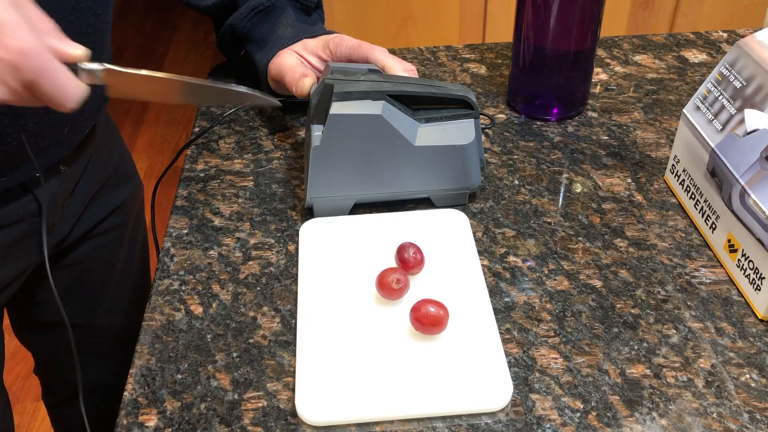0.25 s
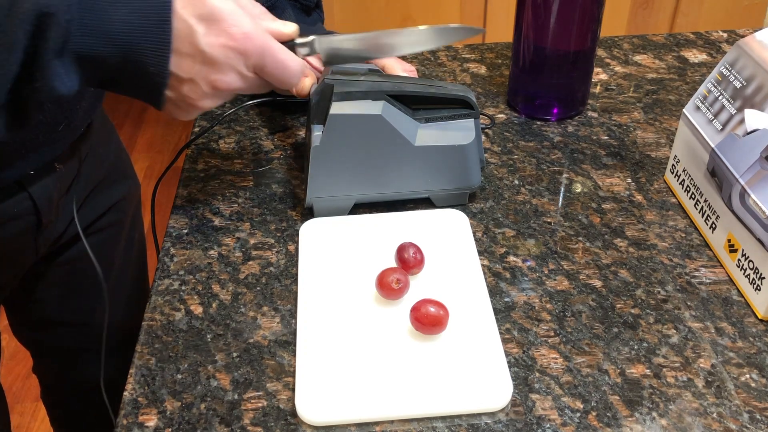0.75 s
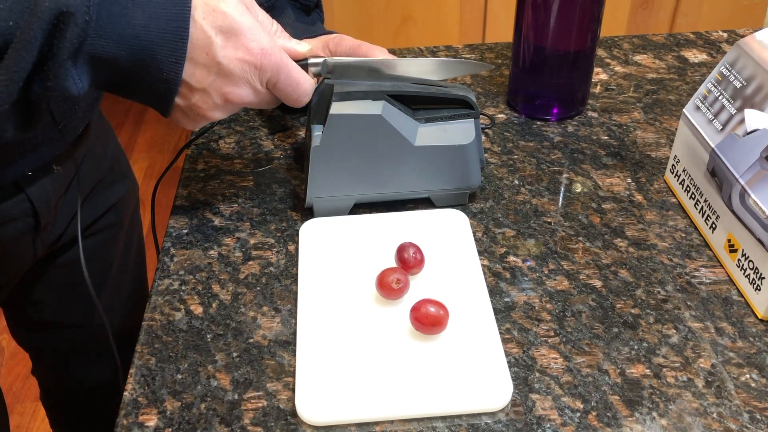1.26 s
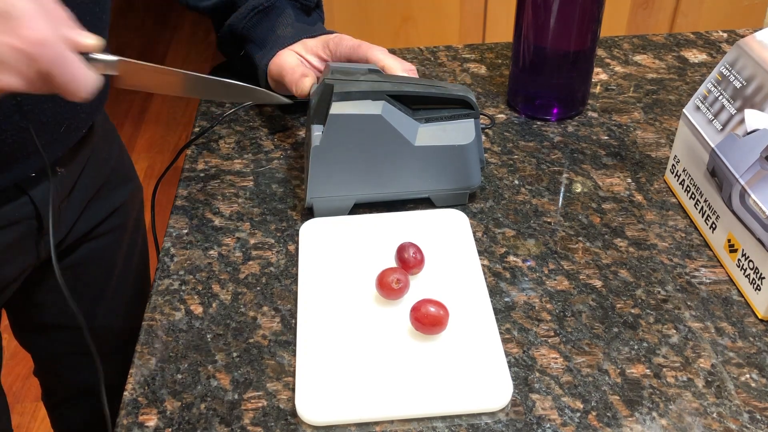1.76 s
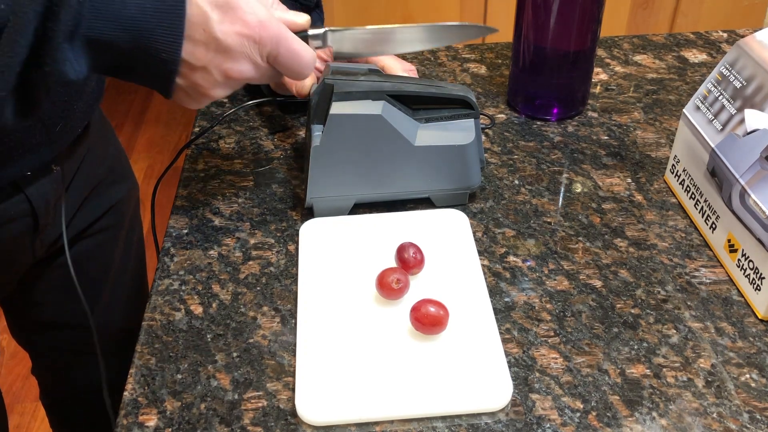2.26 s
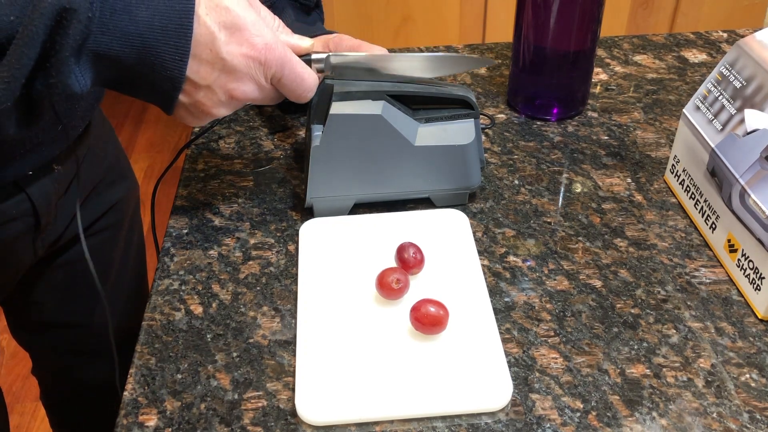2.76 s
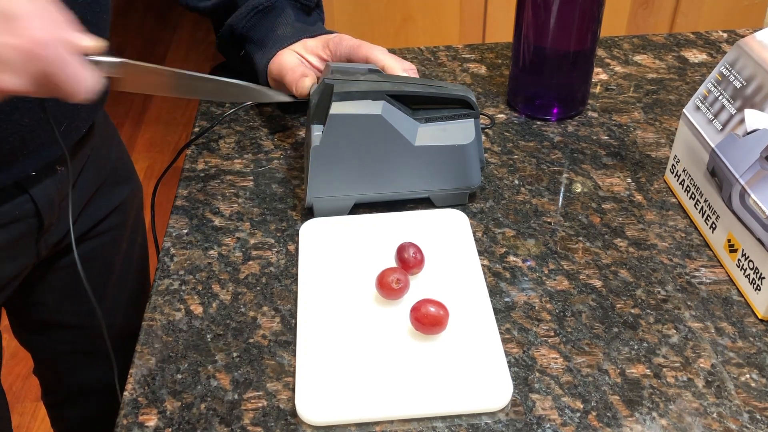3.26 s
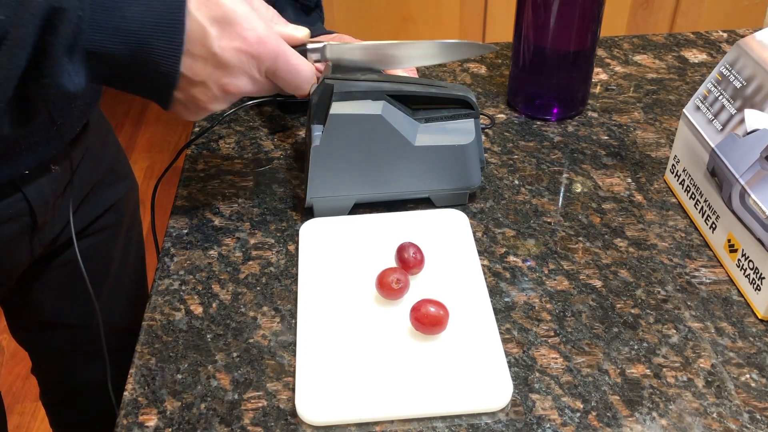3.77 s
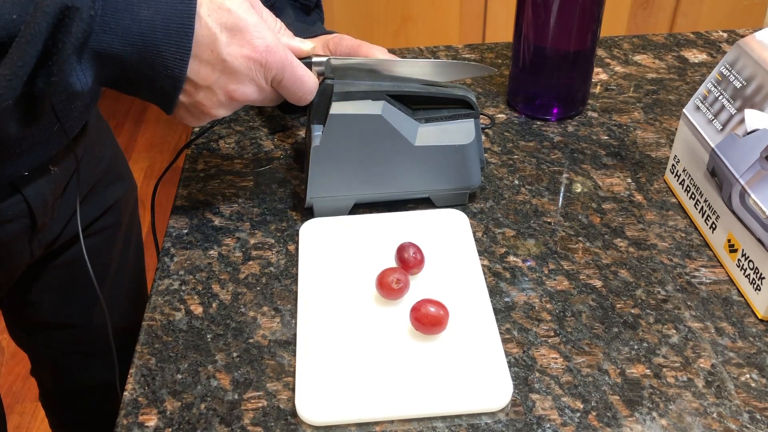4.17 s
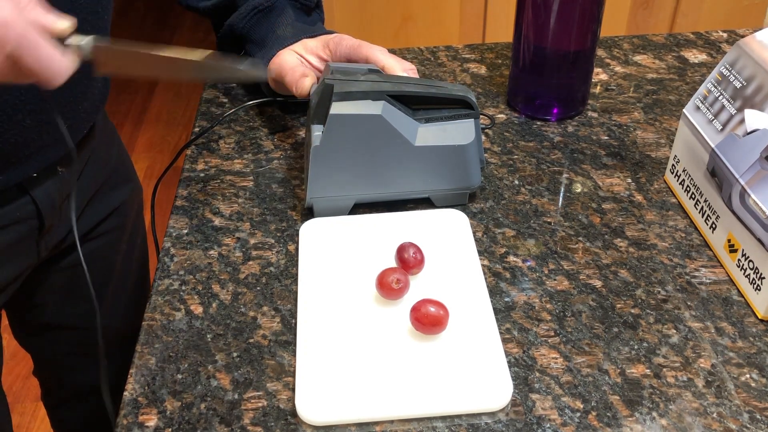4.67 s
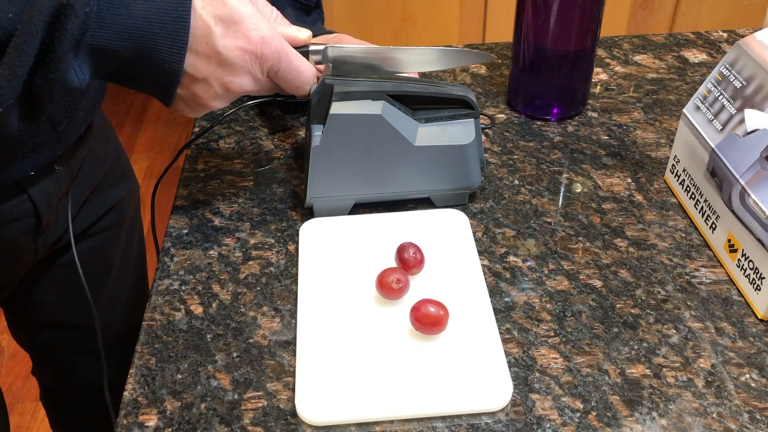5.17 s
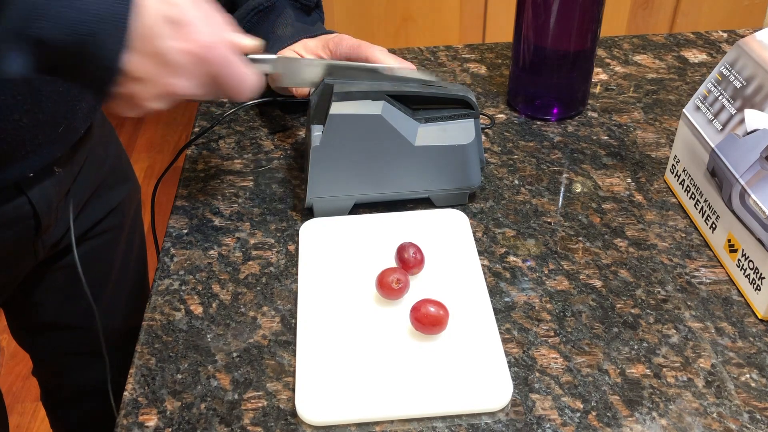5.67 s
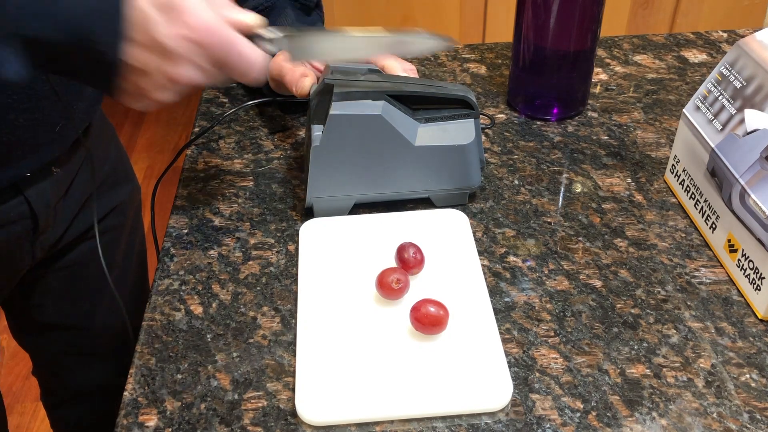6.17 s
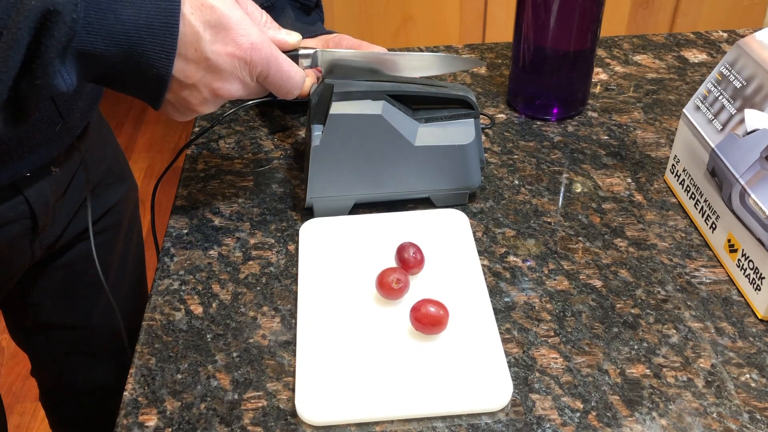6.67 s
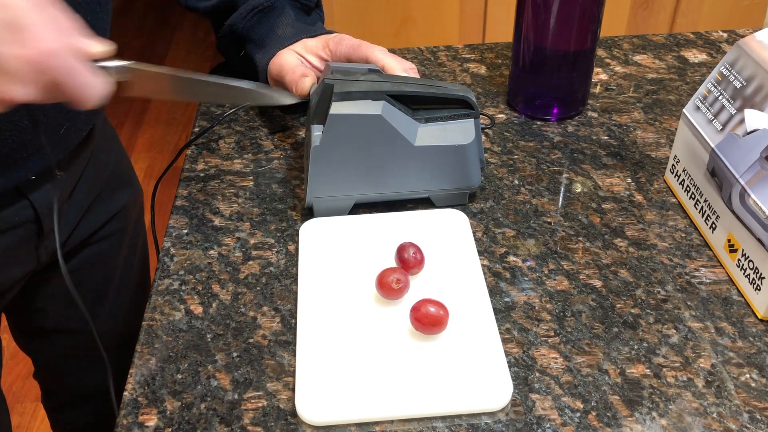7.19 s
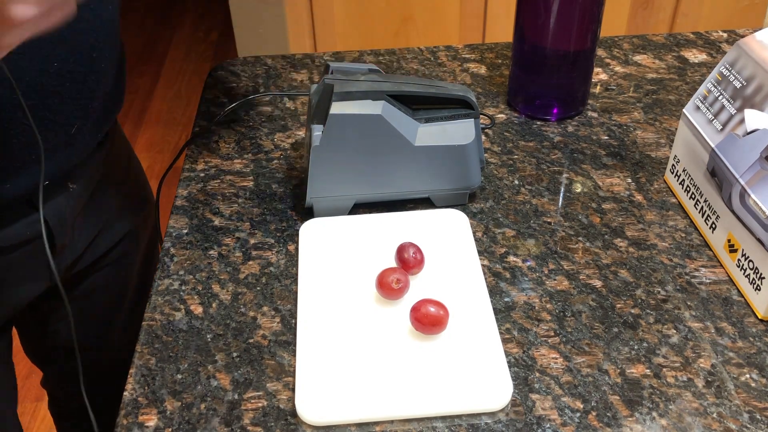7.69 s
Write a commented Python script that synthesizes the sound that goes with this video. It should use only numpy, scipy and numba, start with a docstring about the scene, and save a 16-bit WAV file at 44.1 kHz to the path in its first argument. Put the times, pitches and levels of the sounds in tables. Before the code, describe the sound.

Six knife strokes through a plastic sharpener on a stone counter, the first already rasping. Each later one begins with a knock of blade in slot, grows into a coarse, buzzy scrape with thin steel hiss, and ends in a loud snap and rattle. The pauses hold soft sleeve rustle, small ticks and quiet room noise. The near microphone catches bumps through the counter and slight kitchen echo.

```python
"""A knife edge is already rasping over grit; it snaps out of the sharpener, and the plastic housing rattles on.
More strokes follow, about 1.4 s apart: the blade taps into the honing slot, is drawn through and snaps out.
Random grains ring the modes of housing and steel; short pulses ring them for the knocks.
A quiet kitchen hums behind as filtered noise; sleeves rustle as soft hiss and ticks are brief tones.
The counter shakes the microphone with slow sway and dull thuds; two moments bring thin squeals."""
import sys
import numpy as np
from scipy import signal
from scipy.fft import rfft, irfft
from scipy.io import wavfile
from scipy.ndimage import uniform_filter1d
from numba import njit

SR = 44100
rng = np.random.default_rng(int(sys.argv[2]) if len(sys.argv) > 2 else 0)


def generate_wav(signal):
    """Clip the signal to [-1, 1] and save it as 16-bit WAV at the path in sys.argv[1]."""
    frames = np.transpose(np.atleast_2d(signal))
    scaled = np.clip(frames, -1, 1) * 32767
    pcm = np.round(scaled).astype(np.int16)
    wavfile.write(sys.argv[1], SR, pcm)


N = 349713  # samples, about 7.9 s

# Tone colour of the room noise. Each row: frequency in Hz, relative level in dB per Hz.
ROOM_COLOUR = [(59, -49), (100, -25.5), (124, -4), (189, -3), (314, -7), (380, -4), (460, -4), (688, -8),
               (1120, -16.5), (2210, -29), (4500, -36.5), (8930, -41.5), (13000, -44), (15800, -52)]
# The room noise swells as the cook steps away. Each row: time in seconds, dB above the steady level.
ROOM_SWELL = [(0, 0), (7.3, 1.5), (7.6, 1.5), (7.93, 5.5)]
# Slow sway of the stand. Each row: time in seconds, level in dB.
SWAY = [(0.0, -54), (0.04, -45), (0.57, -41), (1.37, -56.5), (1.72, -39.5), (3.07, -58), (3.24, -37),
        (3.95, -58), (4.06, -48.5), (4.62, -39), (5.46, -56), (5.81, -40), (6.07, -42), (6.4, -55),
        (6.67, -39), (6.73, -42.5), (7.09, -42.5), (7.93, -53)]
# Thuds through the counter. Each row: peak time in seconds, level in dB, rise in seconds, fall in seconds.
THUDS = [(.04, -41, 0.05, 0.11), (.15, -42.5, 0.071, 0.11), (0.558, -43.5, 0.057, 0.089),
         (.64, -58, 0.031, 0.048), (.7, -45, 0.12, 0.071), (.8, -52, 0.053, 0.05), (1.19, -53, 0.08, 0.072),
         (1.63, -46, 0.32, 0.4), (2.72, -59, .05, 0.16), (3.03, -46.5, 0.025, 0.048),
         (3.16, -38, 0.08, 0.034), (3.4, -65, .15, .2), (4.3, -53, 0.17, 0.064), (4.46, -45, 0.11, 0.055),
         (5.39, -56.5, 0.058, 0.081), (5.59, -45, 0.045, 0.1), (5.78, -41.5, 0.29, 0.081),
         (6.18, -55.5, 0.077, 0.036), (7.12, -44.5, 0.41, 0.1), (7.58, -53, 0.11, 0.034)]
# Resonances of the housing. Each row: pitch in Hz, basic width in Hz (scaled when used), relative level in dB.
HOUSING_MODES = [(388, 54, -4), (437.8, 18.7, 2.5), (492.8, 40.5, -1.5), (570.6, 69, -4.5), (709, 41, -8),
                 (830.7, 28.4, -1.5), (884.7, 32, -2), (1029, 105, -21.5)]
# Higher resonances of the housing. Each row: pitch in Hz, basic width in Hz, relative level in dB.
UPPER_MODES = [(1006, 59, 3.5), (1346, 153, 11.5), (1559, 35, -1.5), (1925, 120, -8.5), (2175, 91, -8.5),
               (2450, 96, -16.5), (2687, 103, -6.5), (3090, 180, -10.5), (3083, 50, -12.5)]
# Resonances of the steel blade. Each row: pitch in Hz, basic width in Hz, relative level in dB.
BLADE_MODES = [(4750, 200, -6), (5520, 330, 5), (6600, 500, -5), (7500, 500, -4), (8400, 550, 0),
               (9430, 300, -3), (10800, 350, -6), (11600, 300, -7), (12300, 350, -2), (13300, 600, -2),
               (14300, 600, -5.5), (15400, 600, -3.5)]
# Pulls of the blade. Each row: time the tip leaves in seconds, time from full pressure to the tip in seconds,
# housing level in dB at full pressure, housing level in dB at the tip,
# upper housing in dB above the housing at the tip, blade hiss in dB above the housing at the tip.
PULLS = [(0.091, 0.11, -39.5, -37, -9, -19.5), (1.626, 0.25, -42.5, -32.5, -13.5, -21.5),
         (3.144, 0.19, -39.5, -36, -13, -21), (4.435, 0.19, -40, -36, -10.5, -19),
         (5.724, 0.15, -39, -33.5, -12.5, -22), (7.089, 0.17, -42, -38, -12, -21)]
# Short scuffs of the edge on the slot. Each row: start in seconds, length in seconds, housing level in dB,
# upper housing in dB above it, blade hiss in dB above it.
SCUFFS = [(2.734, 0.051, -55, -17, -23), (4.014, 0.018, -44.5, -17, -25), (7.109, 0.036, -38, -2, -23)]
# The housing settles on its feet after taps and snaps. Each row: start in seconds, housing level in dB,
# upper housing in dB above it, fade of the housing in dB per second.
RATTLES = [(0.1, -36, -5, 269), (1.178, -47, -16, 297), (1.643, -38.5, -1.5, 230), (2.784, -46, -39, 502),
           (3.162, -39, -1, 314), (3.251, -48, -6.5, 91), (3.426, -48.5, -10, 303), (4.045, -57, -23, 200),
           (4.449, -35.5, 0, 414), (4.572, -51.5, -5.5, 86), (5.39, -46.5, -32, 452),
           (5.739, -36.5, 0, 246), (6.79, -53, -1.5, 200), (7.15, -46, 0, 288)]
# The next five hold one value each for the housing, the upper housing and the blade, in that order.
# Level of first touch, in dB relative to full pressure.
TOUCH_DB = -20, -17, -16
# Gain over the housing from full pressure to the thin tip, in dB.
BRIGHTEN_DB = 0, 6, 3
# How unevenly the modes are caught: typical spread in dB.
UNEVEN_DB = 2.0, 3.0, 3.0
# Typical pitch wander of the modes as the contact slides, as a share of their pitch.
DRIFT = .015, .022, .012
# Mode widths while the grit damps them, as a share of the basic widths.
RUBBED_WIDTH = .68, .9, .75
# Broad response between the modes in dB, in the same order of three.
VALLEY_DB = -17, -8, -14
# Blade against slot and housing against counter. Each row: start in seconds, housing peak in dB,
# upper housing peak in dB above it, blade crack peak in dB above it, pitch of the driving thump in Hz.
KNOCKS = [(0.09, -23, -2, -8, 770), (0.776, -48, -22, -23, 590), (0.863, -50, -18, -27, 680),
          (0.96, -52, -11, -17, 615), (1.16, -27, -11.5, -22, 490), (1.271, -51, -6, -27, 433),
          (1.624, -27.5, 4.5, -2, 644), (1.63, -22.5, -4.5, -4.5, 510), (2.713, -47, -17, -40, 580),
          (2.762, -38, -18, -22, 485), (2.774, -32.5, -10, -38, 470), (2.851, -55, -17, -23, 517),
          (3.146, -20, -3, -13, 675), (3.155, -34.5, 2, -14, 595), (3.179, -34, -21, -28, 850),
          (3.249, -42.5, 4.5, -32, 394), (3.289, -40, -0.5, -32, 515), (3.342, -41, -3, -21, 503),
          (3.423, -48, -0.5, -23, 494), (3.868, -40, -38, -36, 570), (3.999, -52, -14, -4, 570),
          (4.027, -31.5, -14.5, -37, 455), (4.402, -26.5, -10.5, -20, 523), (4.435, -19.5, -6.5, -15, 653),
          (4.45, -33, -4, -12, 617), (4.465, -47, 0, -22, 586), (4.478, -36.5, -2, -10, 510),
          (4.567, -37, -4, -25, 513), (5.15, -51, -22, -21, 563), (5.377, -29, -8.5, -24.5, 463),
          (5.726, -12, -8, -15, 610), (5.749, -31, -10, -24, 550), (5.764, -29, -11, -16, 500),
          (5.783, -36, -4, -10, 590), (6.238, -42.5, -20, -45, 623), (6.774, -35.5, -9, -36, 468),
          (7.091, -16, -11.5, -25, 654), (7.11, -33.5, 2, -7, 388), (7.124, -37, 6.5, 3, 382),
          (7.138, -39, 2, -15, 450), (7.148, -46, -4, -8, 450)]
# The arm swings back after each pull. Each row: start in seconds, end in seconds.
ARM_SWINGS = [(.1, .78), (1.68, 2.42), (3.18, 3.85), (4.5, 5.12), (5.8, 6.28), (7.15, 7.8)]
# Small dry ticks nearby. Each row: start in seconds, tone level before its decay in dB, pitch in Hz,
# gain of the bright noise edge in dB relative to the tone.
TICKS = [(0.2618, -54, 3080, 1), (.274, -72, 5700, -4), (.293, -69, 5700, -4), (.294, -72, 10500, -4),
         (0.416, -64, 3060, 8), (0.6689, -72, 3570, 9), (0.8091, -68, 2790, 8), (1.0026, -58, 2940, -5),
         (1.929, -63, 2710, -8), (2.4309, -57.5, 3060, -4), (4.7082, -60, 3040, -3),
         (5.2245, -67, 3070, -4), (6.0048, -58, 2940, -1), (6.4936, -55, 2960, 1), (7.3412, -63, 3060, -4),
         (7.8321, -56, 3000, 0), (7.426, -65, 2000, 0)]
# Thin squeals as the blade settles. Each row: start in seconds, length in seconds, pitch in Hz,
# starting level in dB, fade over its length in dB.
SQUEALS = [(5.285, 0.07, 1920, -76, 3), (5.38, 0.055, 5960, -75, 10), (5.38, .02, 12300, -82, 8)]

KITCHEN_DB = -60.5  # steady level of the room noise
WHINE_HZ, WHINE_DB = 9997, -97
THUD_FLOOR_DB = -62.5  # level between thuds
BITE_S = .135  # seconds from first touch to full pressure
# dry hiss after a snap: dB above the upper housing, fade relative to the housing, centre in Hz
JINGLE_DB, JINGLE_FADE, JINGLE_HZ = -13, 1.4, 5300.
SLEEVE_DB = -78
ROOM_T60_S, ROOM_DAMP, ROOM_DB = .4, .25, -18  # echo: die-away setting in seconds, dulling share, gain in dB
TOP_HZ = 15800


def undb(db):
    """Turn decibels into a gain."""
    return 10 ** (np.asarray(db) / 20)


def unit(x):
    """Scale a sound so that its average strength (rms) is 1."""
    return x / np.sqrt(np.mean(x ** 2))


@njit
def svf(x, hz, width):
    """Let through a band around one pitch, as a resonator does; gain is 1 at the centre."""
    y, band, low = np.empty(len(x)), 0., 0.
    g, k = np.tan(np.pi * hz / SR), width / hz
    for i in range(len(x)):
        # the tiny offset keeps the numbers from becoming too small to compute quickly
        v = (band + g * (x[i] + 1e-18 - low)) / (1 + g * (g + k))
        band, low, y[i] = 2 * v - band, low + 2 * g * v, k * v
    return y


@njit
def svf_moving(x, hz, width):
    """The same resonator with a centre pitch that moves."""
    y, band, low = np.empty(len(x)), 0., 0.
    for i in range(len(x)):
        g, k = np.tan(np.pi * hz[i] / SR), width / hz[i]
        v = (band + g * (x[i] + 1e-18 - low)) / (1 + g * (g + k))
        band, low, y[i] = 2 * v - band, low + 2 * g * v, k * v
    return y


def svf_twice(x, hz, width):
    """Two equal resonators in a row fall off more steeply."""
    return svf(svf(x, hz, width), hz, width)


def walk(rate):
    """Random levels held for 1 / rate seconds and smoothed twice; rms is near 1."""
    hold = int(SR / rate)
    steps = np.repeat(rng.standard_normal(N // hold + 1), hold)
    return unit(uniform_filter1d(uniform_filter1d(steps, hold), hold)[:N])


def shape(s, db, rise_s=0.025):
    """Gain that fades in, follows the given levels and stops within 10 ms."""
    s = np.r_[s[0] - rise_s, s, s[-1] + .01]
    db = np.r_[-90, db, -90]
    return undb(np.interp(np.arange(N) / SR, s, db, -120, -120))


def ring(force, modes, between_db, widen, touch=None):
    """A force sets the modes ringing, neighbours in opposite phase; a broad response fills the valleys."""
    lowest_hz, highest_hz = modes[0][0], modes[-1][0]
    out = undb(between_db) * force
    for k, (hz, width, db) in enumerate(modes):
        gain, bend = (1, np.ones(len(force))) if touch is None else touch[k]
        out = out + (-1) ** k * undb(db) * svf_moving(gain * force, hz * bend, widen * width)
    # little is radiated outside this family of modes
    edges = [0.93 * lowest_hz, 1.106 * highest_hz]
    return signal.sosfilt(signal.butter(3, edges, "bandpass", fs=SR, output="sos"), out)


def kitchen():
    """Steady room noise whose bands swell a little, and a thin electrical whine."""
    t = np.arange(N) / SR
    hz, db = np.transpose(ROOM_COLOUR)
    f = np.maximum(np.fft.rfftfreq(N, 1 / SR), 1)
    colour = undb(np.interp(np.log(f), np.log(hz), db, -120, -120))
    noise = 0
    for centre in 100 * 2. ** np.arange(8):  # one band per octave
        band = np.clip(1 - np.abs(np.log2(f / centre)), 0, 1) ** .5
        part = irfft(rfft(rng.standard_normal(N)) * colour * band, N)
        noise = noise + part * undb(1.5 * walk(1.0))
    whine = np.sqrt(2) * np.sin(2 * np.pi * WHINE_HZ * t + 0.38 * walk(49))
    room_db = KITCHEN_DB + np.interp(t, *np.transpose(ROOM_SWELL))
    return undb(room_db) * unit(noise) + undb(WHINE_DB) * whine


def shake():
    """The stand sways below hearing and passes on dull thuds."""
    t = np.arange(N) / SR
    sway = svf_twice(rng.standard_normal(N), 6.45, 7.5)
    thud = svf_twice(rng.standard_normal(N), 45., 79.)
    # evened out, so that each thud has its own strength
    thud = thud / np.sqrt(uniform_filter1d(thud ** 2, size=3000))
    ramps = [np.interp(t, [s - rise, s, s + fall], [THUD_FLOOR_DB, db, THUD_FLOOR_DB])
             for s, db, rise, fall in THUDS]
    thud_db = np.max(ramps, axis=0)
    sway_db = np.interp(t, *np.transpose(SWAY))
    return unit(sway) * undb(sway_db) + unit(thud) * undb(thud_db)


def grit(rate, scatter_db):
    """Grains of abrasive catch the edge at random moments, a few much harder than most."""
    caught = rng.random(N) < rate / SR
    return caught * rng.standard_normal(N) * undb(scatter_db * rng.exponential(size=N))


def rubbed(modes, rate, scatter_db, layer, shift_rate, judder):
    """Grit drives the modes; as the contact slides, each wanders in pitch and is caught now more, now less."""
    touch = [(undb(UNEVEN_DB[layer] * walk(shift_rate)), 1 + DRIFT[layer] * walk(9)) for _ in modes]
    force = grit(rate, scatter_db) * judder
    return unit(ring(force, modes, VALLEY_DB[layer], RUBBED_WIDTH[layer], touch))


def squeaks(rate, lo_hz, hi_hz, length_s):
    """Single grains scratch the edge for a few ms each, every one at its own sliding pitch."""
    out, t = np.zeros(N + SR), np.arange(int(length_s * SR)) / SR
    for at, pitch, slide, size in rng.random((int(rate * N / SR), 4)):
        hz = lo_hz + (hi_hz - lo_hz) * pitch
        sweep = np.sin(2 * np.pi * hz * t * (1 + 0.05 * (slide - .75) * t / length_s))
        strength = -np.log(1 - size)  # many weak scratches, few strong ones
        out[int(at * N):][:len(t)] += strength * sweep * np.hanning(len(t))
    return unit(out[:N])


def pressure(layer):
    """Gain of housing (0), upper housing (1), blade (2) or after-hiss (3): pulls climb, scuffs hold, rattles fade."""
    gain = 0
    for tip, pressed, full_db, tip_db, *above in PULLS if layer < 3 else []:
        above_db = [0, *above][layer]
        base = full_db + above_db - BRIGHTEN_DB[layer]
        times = [tip - pressed - BITE_S, tip - pressed, tip]
        gain = np.maximum(gain, shape(times, [base + TOUCH_DB[layer], base, tip_db + above_db]))
    for s, length, db, *above in SCUFFS if layer < 3 else []:
        level = db + [0, *above][layer]
        gain = np.maximum(gain, shape([s, s + length], [level, level]))
    for s, db, upper_db, fade in RATTLES if layer != 2 else []:
        top = db + [0, upper_db, 0, upper_db + JINGLE_DB][layer]
        fade = fade * (JINGLE_FADE if layer == 3 else 1)
        gain = np.maximum(gain, shape([s, s + 40 / fade], [top, top - 40]))
    return gain


def rasp():
    """The drawn edge judders over the grit until the tip snaps out; the housing buzzes and hisses on briefly."""
    judder = walk(60)
    housing = rubbed(HOUSING_MODES, 3000, 2.0, 0, 15, undb(0.81 * judder))
    upper = rubbed(UPPER_MODES, 2500, 1.5, 1, 20, undb(1.7 * judder))
    blade = rubbed(BLADE_MODES, 12000, 0.46, 2, 30, undb(0.47 * judder))
    blade = unit(blade + undb(-8.5) * squeaks(800, 10500, 15600, .012))
    jingle = unit(svf_twice(grit(5000, 1.5), JINGLE_HZ, 6000.))
    layers = (housing, upper, blade, jingle)
    return sum(pressure(layer) * part for layer, part in enumerate(layers))


def knocks():
    """The struck wall thumps under the hand and rings the housing; the edge chips, the steel cracks briefly."""
    out, t = np.zeros(N), np.arange(int(.1 * SR)) / SR
    dull = signal.butter(2, 11000, fs=SR, output="sos")
    fades_s = np.array([[0.0025], [0.0013]])  # upper housing, blade
    for s, low_db, upper_db, crack_db, hz in KNOCKS:
        thump = np.sin(2 * np.pi * hz * t) * t * np.exp(-(t / 0.0024) ** 2)
        chips = rng.standard_normal((2, len(t))) * t * np.exp(-t / fades_s)
        housing = ring(thump, HOUSING_MODES, 4.3, 0.69)
        upper = ring(chips[0], UPPER_MODES, -5, 3.1)
        crack = signal.sosfilt(dull, ring(chips[1], BLADE_MODES, -7, 2.2))
        parts = ((low_db, housing), (low_db + upper_db, upper), (low_db + crack_db, crack))
        for db, hit in parts:
            out[int(s * SR):][:len(t)] += undb(db) * hit / np.abs(hit).max()
    return out


def sleeves():
    """Cloth brushes on cloth, loudest in mid-swing: a soft wide hiss."""
    t = np.arange(N) / SR
    speed = sum(np.sin(np.pi * np.clip((t - start) / (end - start), 0, 1)) for start, end in ARM_SWINGS)
    cloth = unit(svf(rng.standard_normal(N), 6500., 11000.))
    return undb(SLEEVE_DB + 1.5 * walk(20)) * np.sqrt(np.abs(speed)) * cloth


def ticks():
    """Each tick is one quickly dying tone with a bright edge of noise."""
    out, t = np.zeros(N + SR), np.arange(int(.03 * SR)) / SR
    fade = np.exp(-t / .002)
    for s, db, hz, edge_db in TICKS:
        edge = svf_twice(rng.standard_normal(len(t)), 4700., 4000.) * fade
        tone = np.sin(2 * np.pi * hz * t) * fade
        out[int(s * SR):][:len(t)] += undb(db) * (tone + undb(edge_db) * edge)
    return out[:N]


def squeals():
    """Each squeal is a narrow, slightly wavering tone that starts almost at once and fades."""
    out, t = 0, np.arange(N) / SR
    for s, length, hz, db, fade_db in SQUEALS:
        tone = np.sqrt(2) * np.sin(2 * np.pi * hz * t + .8 * walk(60))
        out = out + tone * shape([s, s + length], [db, db - fade_db], .004)
    return out


@njit
def walls(x, lags, gain, damp):
    """Echoes go round eight delay lines that feed each other, duller on every round."""
    line, soft, out = np.zeros((8, 4096)), np.zeros(8), np.zeros(len(x))
    for i in range(len(x)):
        total = 0.
        for k in range(8):
            soft[k] += (1 - damp) * (gain[k] * line[k, (i - lags[k]) & 4095] - soft[k])
            total += soft[k]
        out[i] = total
        for k in range(8):
            line[k, i & 4095] = x[i] + soft[k] - total / 4
    return out


def scene():
    """Near sounds, their echo off the kitchen walls, and the background."""
    near = rasp() + knocks() + ticks() + squeals()
    lags = rng.integers(300, 2400, 8)  # delays in samples
    room = walls(near, lags, undb(-60 * lags / SR / ROOM_T60_S), ROOM_DAMP)
    return (near + undb(ROOM_DB) * room + sleeves() + shake() + kitchen())[None]


def record(dry):
    """A steep filter cuts the top of the treble."""
    return signal.sosfilt(signal.ellip(10, .2, 70, TOP_HZ, fs=SR, output="sos"), dry)


dry = scene()
out = record(dry)
generate_wav(out)
```